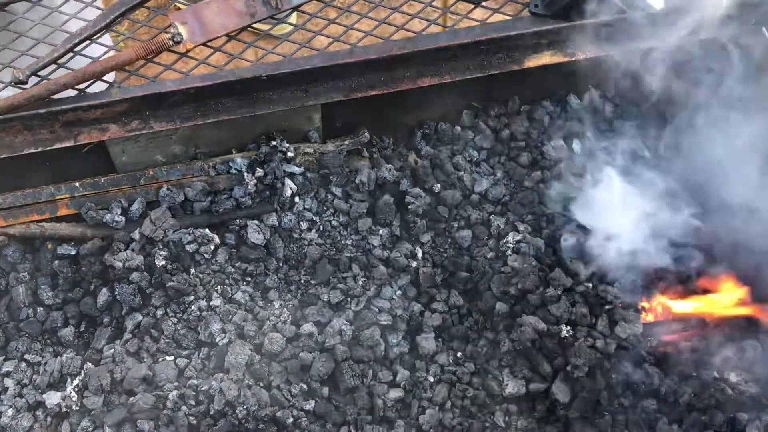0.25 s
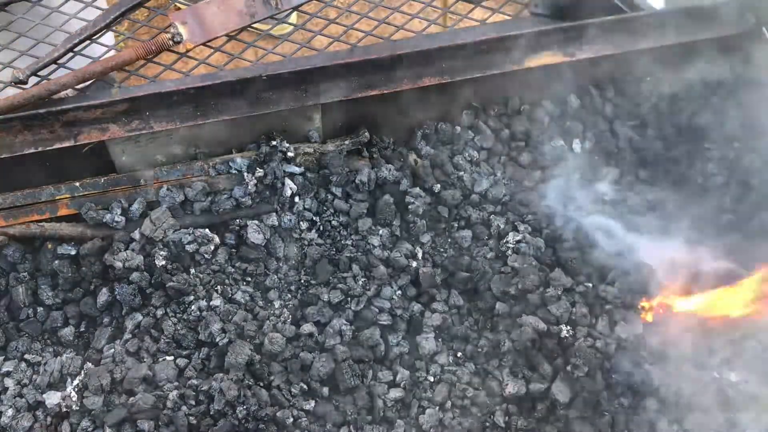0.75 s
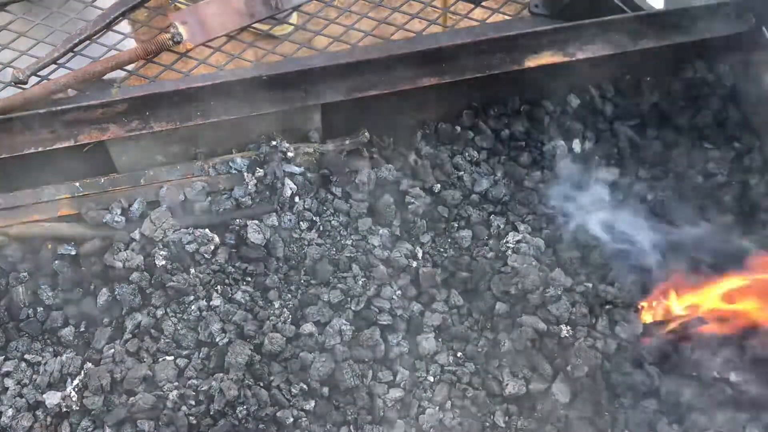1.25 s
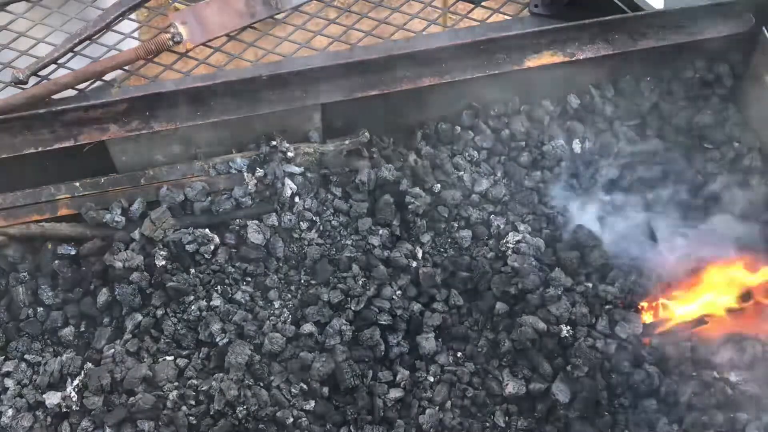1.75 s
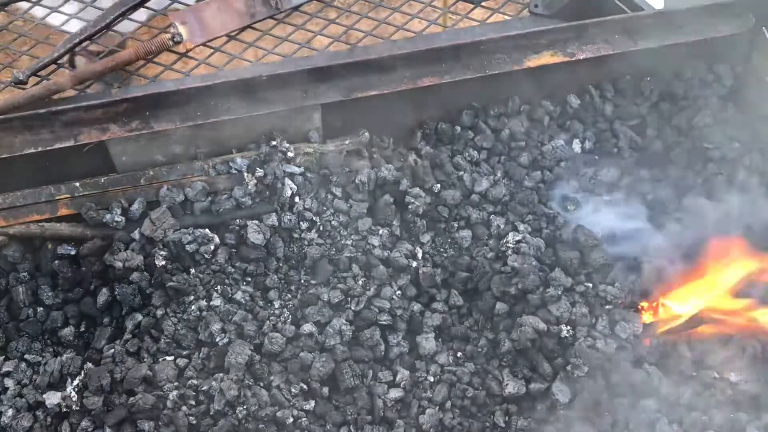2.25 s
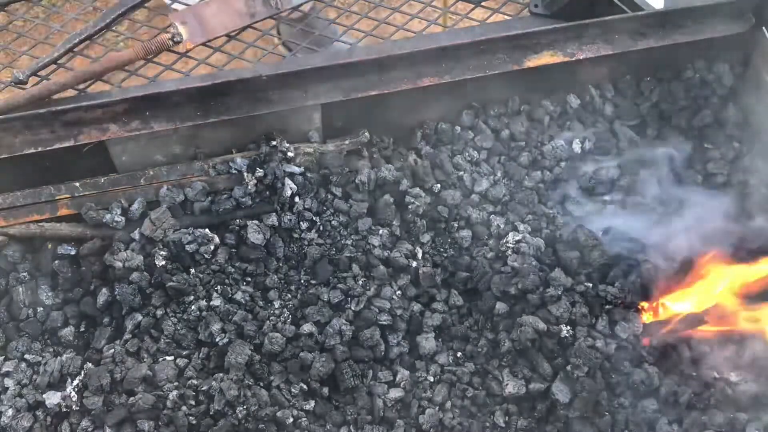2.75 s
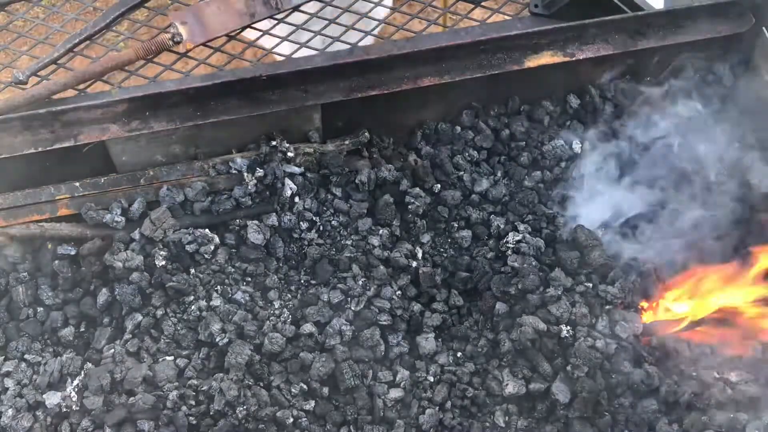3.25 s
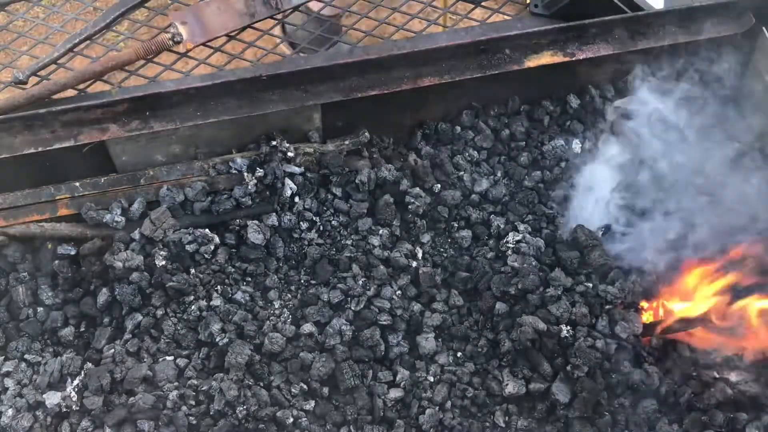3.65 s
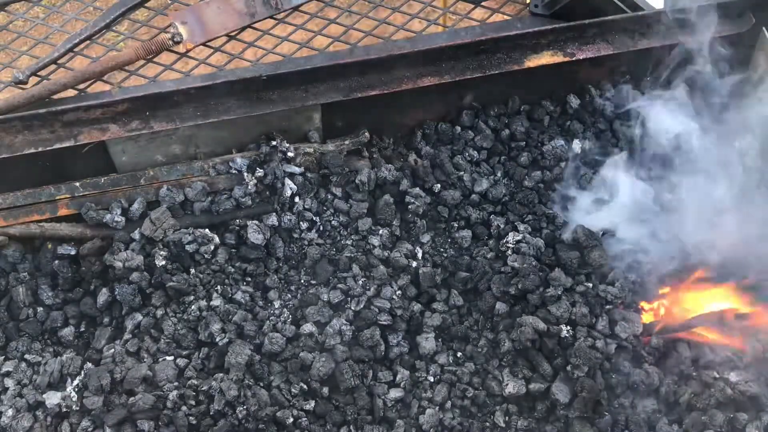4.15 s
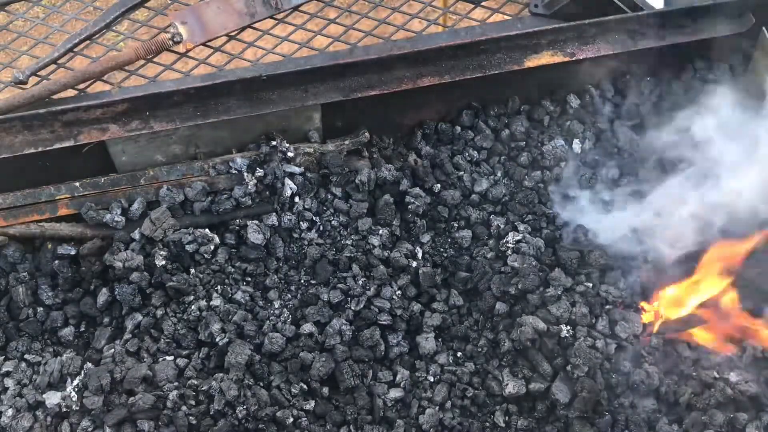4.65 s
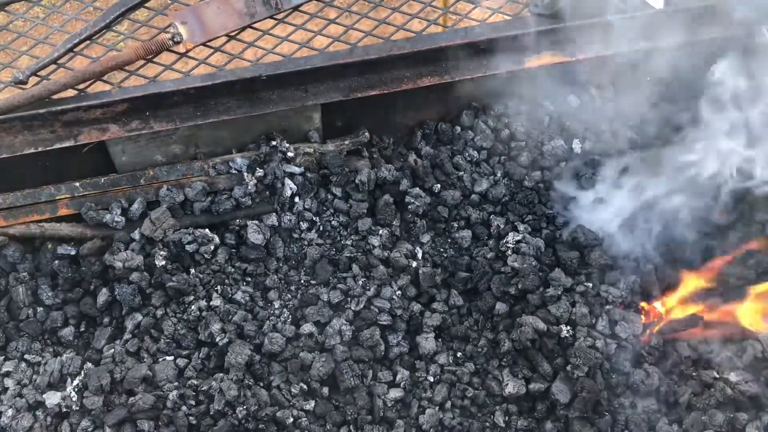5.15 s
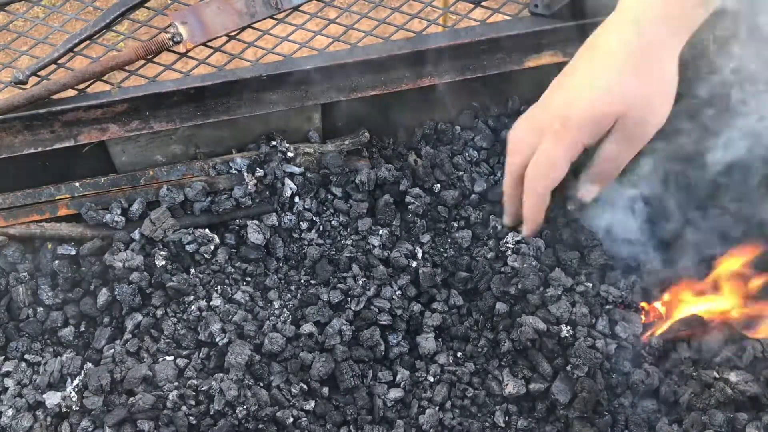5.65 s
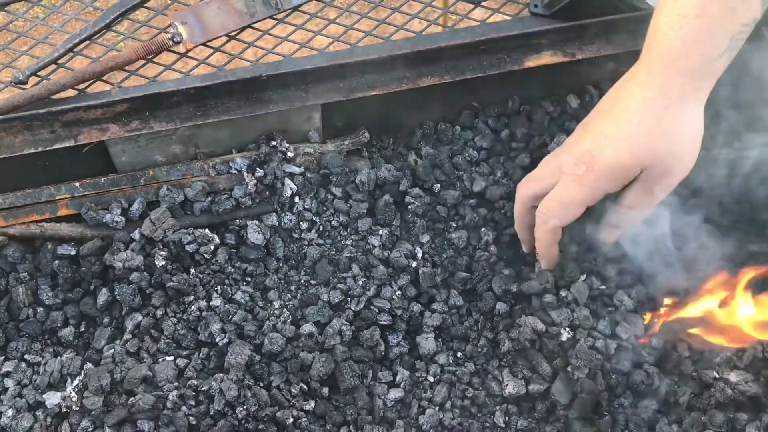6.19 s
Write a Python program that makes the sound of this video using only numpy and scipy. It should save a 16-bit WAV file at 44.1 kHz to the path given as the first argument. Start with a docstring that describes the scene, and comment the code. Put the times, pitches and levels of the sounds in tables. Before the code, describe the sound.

A forge blower on low whines throughout, a steady, nearly unchanging tone near 700 Hz with a strong octave above. Its air rushes through a coal bed as a soft low roar, a little stronger at first. Tiny dry ticks and faint gas hiss scatter over it, with one loud snap before the middle. At the end cloth rustles close to the single outdoor microphone.

```python
"""Electric forge blower on low, outdoors, one microphone: a 30-blade wheel, slightly off centre, whines at the
blade rate from the first moment while its air rushes up through a bed of coal. The draught, noise in three
bands, starts strong and settles over a few seconds; two gusts touch the microphone just before 1 s. Gas hisses
in soft puffs and coal cracks in sharp pulses, with the loudest snap near 2.7 s. From 5.6 s a sleeve rustles
close to the microphone, cloth noise with fine crackles and sharp snaps, and swells twice."""
import sys
import numpy as np
from scipy import signal
from scipy.fft import rfft, irfft, next_fast_len
from scipy.io import wavfile
from scipy.ndimage import uniform_filter1d, map_coordinates

SR = 44100
rng = np.random.default_rng(int(sys.argv[2]) if len(sys.argv) > 2 else 0)


def dump_mix(stems):
    """Bounce the given channels to the path in sys.argv[1] as a 16-bit WAV at rate SR."""
    frames = np.atleast_2d(stems).T  # one column per channel
    limited = np.clip(frames, -1, 1)  # hard clip at full scale
    pcm = np.round(limited * 32767).astype(np.int16)
    wavfile.write(sys.argv[1], SR, pcm)


N = 283122

# Blower wheel
BLADES = 30
START_TURN = 0.406  # where the wheel stands at the first moment, in turns
# cycles by which side lines lead: below any tone, and above the overtones
LEAD_BELOW, LEAD_ABOVE = 0.12, 0.22
# shaft speed: time_s, speed_turns_per_s
SHAFT_SPEED = [(0.0, 23.332), (0.8, 23.302), (1.2, 23.296), (1.6, 23.246), (2.3, 23.169), (2.8, 23.181),
               (3.4, 23.208), (4.0, 23.244), (4.8, 23.22), (5.2, 23.216), (5.6, 23.173), (6.42, 23.165)]
# whine at the microphone as hot air bends its path: time_s, blade_tone_db, octave_db, twelfth_db
WHINE_LEVELS = [(0, -38.5, -42.5, -61), (.45, -39, -41.5, -62.5), (.65, -37, -41, -62),
                (.86, -37.5, -43, -61), (1.3, -35, -41, -60.5), (1.55, -34, -40.5, -66),
                (2.05, -34.5, -39.5, -61), (2.6, -34, -40, -60.5), (2.82, -33, -39, -63),
                (3.09, -37.5, -39, -66), (3.38, -34, -39.5, -61), (3.66, -33.5, -41, -59),
                (4.04, -36.6, -38.5, -59.5), (4.36, -35, -41, -61.5), (4.6, -32.5, -37, -62),
                (5.2, -34.5, -40.5, -58), (5.4, -36, -39.5, -60), (5.72, -34.5, -37.5, -58.5),
                (6.42, -34, -38.5, -66)]
# random flicker of blade tone, octave and twelfth: one flicker_db for each
WHINE_FLICKER_DB = [0.42, .5, 1.5]
# lines round the blade tone from the off-centre wheel: shaft_multiple, level_db (on the blade tone's level)
BLADE_TONE_LINES = [(24, -31), (28, -27), (29, -28), (30, 0), (31, -18.5), (32, -32), (45, -28)]
# lines round the octave: shaft_multiple, level_db (on the octave's level)
OCTAVE_TONE_LINES = [(57, -28), (58, -20.5), (59, -19.5), (60, 0), (61, -16.5), (62, -32), (65, -35)]
# lines round the twelfth and higher: shaft_multiple, level_db (on the twelfth's level)
TWELFTH_TONE_LINES = [(90, -1.5), (91, -5.5), (92, -14), (119, -15), (120, -15), (121, -16), (122, -16),
                      (123, -17), (180, -24)]

# Draught through the coal; each spectrum sets only the colour
ROAR_DB, BLAST_DB, JET_DB = -40.5, -45, -56  # once settled
ROAR_EXTRA_DB, BLAST_EXTRA_DB, JET_EXTRA_DB = 3, 3, 1  # added at the start
SETTLE_S = 1.95
# flame roar: pitch_hz, relative_level_db (per Hz)
ROAR_SPECTRUM = [(18, -46.5), (30, -31), (45, -22), (57, -4), (75, -9), (105, -4.5), (150, 1), (220, -2),
                 (255, -4), (300, -2), (350, -6), (410, 0.5), (460, -3), (520, -12.5), (700, -56.5)]
# air blast: pitch_hz, relative_level_db (per Hz)
BLAST_SPECTRUM = [(380, -40.5), (500, -12.5), (560, -1), (660, -4.5), (780, -11.5), (880, -1.5),
                  (1100, -4.5), (1300, -5), (1420, -4.5), (1480, -14), (1540, -11), (1680, -20.5),
                  (1850, -22.5), (2000, -38.5)]
# jet through the grate: pitch_hz, relative_level_db (per Hz)
JET_SPECTRUM = [(1600, -20.5), (1850, -2.5), (2000, 3), (2300, 1.5), (2650, -2), (2850, -0.5), (3300, -5),
                (3800, -7.5), (4500, -7), (5600, -10), (6800, -19), (8000, -28), (10000, -32.5),
                (16000, -50.5)]

# Cracking coal, and from 5.7 s sharp snaps of the rustling sleeve sharp pulses: start_s, peak_db (of the pulse,
# before grit and knock), low_edge_hz, high_edge_hz
SHARP_PULSES = [(.0115, -56, 10000, 15500), (.0389, -51.5, 8900, 13900), (.0789, -47, 6000, 15500),
                (.157, -57, 8000, 14500), (.2411, -52, 7000, 14000), (.3536, -58.5, 8000, 15500),
                (.3913, -57, 8500, 15500), (.4489, -55, 9000, 15000), (.464, -47, 7500, 15500),
                (.4875, -51, 6000, 11000), (.7829, -50.5, 8000, 15500), (.9608, -51.5, 6500, 10100),
                (1.2591, -40.5, 9500, 15500), (1.4581, -48, 8000, 14900), (1.465, -56, 9500, 14000),
                (1.4963, -48, 8500, 15400), (1.524, -51, 8000, 16000), (1.7815, -39.5, 7000, 14000),
                (1.81, -56, 9000, 15600), (1.8173, -46.5, 6000, 15400), (2.0377, -49, 5500, 7500),
                (2.1723, -46, 7500, 14000), (2.37, -54, 9500, 15500), (2.4048, -51, 8500, 15800),
                (2.4218, -57.5, 8000, 15000), (2.5754, -53, 8000, 15500), (2.622, -55, 9500, 15400),
                (2.6382, -60.5, 9500, 15500), (2.655, -26, 5180, 10800), (2.9866, -54.5, 12500, 15800),
                (3.0151, -53.5, 10000, 15800), (3.1906, -59, 9000, 15900), (3.1946, -51.5, 9000, 15800),
                (3.382, -57, 9500, 15800), (3.9907, -51, 5000, 15000), (4.3381, -58, 9000, 15000),
                (4.4751, -52.5, 9000, 13400), (5.0814, -57, 8500, 12600), (5.429, -40.5, 4500, 13500),
                (5.514, -52, 10500, 15800), (5.701, -35, 2500, 6500), (5.82, -42, 7500, 10500),
                (5.903, -38.5, 10500, 13000), (5.9587, -41.5, 5000, 12500), (6.048, -41, 7500, 10000),
                (6.283, -41, 6500, 10600), (6.3267, -38.5, 7500, 14950), (6.398, -35, 11000, 12100)]
# a duller answer to each pulse; its band edges are multiples of the pulse's low edge
KNOCK_DB, KNOCK_LOW, KNOCK_HIGH, KNOCK_LAG_S = -6, 0.28, 0.7, 0.001
SPLINTERS, SPLINTER_T60_S = 0.55, 0.009  # noise amplitude beside the unit click, and its decay
GRIT_DB, GRIT_CYCLES = -21, 1150  # grit under the crack; its t60 in cycles of the band's middle

# Sleeve close to the microphone
# rustle, two swells after a sudden start: time_s, level_db (of the cloth noise, before its crackles)
RUSTLE_LEVEL = [(5.615, -100), (5.625, -55.5), (5.7, -54), (5.82, -54.5), (5.89, -49), (5.93, -51),
                (5.98, -48.5), (6.06, -46.5), (6.11, -50.5), (6.155, -59), (6.23, -57.5), (6.29, -49),
                (6.35, -48.5), (6.42, -57)]
# cloth noise: pitch_hz, relative_level_db (per Hz)
RUSTLE_SPECTRUM = [(1200, -18.5), (2500, -2), (4000, -4), (6000, -3), (8000, -3), (9700, 2), (12000, 0),
                   (14000, -3.5), (16500, -5)]

# Gas from the lumps
SIMMER_DB = -73.5
# puffs of gas over the simmer: peak_s, peak_db, rise_s, fall_s
GAS_PUFFS = [(.045, -70, .04, .04), (.33, -76, .15, 0.088), (.95, -72, 0.088, .04), (1.36, -71.5, .12, .07),
             (1.57, -66.5, .04, .012), (3.5, -73, .12, 0.14), (4.15, -68, .05, .06),
             (5.13, -77.5, .05, 0.098)]
# seeping gas: pitch_hz, relative_level_db (per Hz)
SEEP_SPECTRUM = [(3000, -27.5), (6000, -0.5), (8000, 0.5), (10000, 0.5), (13000, -4), (16500, -3)]

# Air on the microphone, and its port
BREEZE_DB, BREEZE_FADE_DB_PER_S = -66.5, 1
# gusts on the microphone: peak_s, peak_db, rise_s, fall_s
MIC_GUSTS = [(.77, -51, .04, .03), (.96, -46, .05, .05)]
# buffeting: pitch_hz, relative_level_db (per Hz)
BUFFET_SPECTRUM = [(15, -28.5), (28, -8), (42, -5), (60, -2.5), (90, -10.5), (150, -41.5)]
# notches of the microphone port: centre_hz, width_hz, depth (0 to 1)
PORT_NOTCHES = [(5000, 275, 0.41), (10400, 590, 0.38)]
TOP_HZ = 15830  # band limit


def amp(db):
    """Gain of a level in dB."""
    return 10 ** (np.asarray(db) / 20)


def unit(x):
    """x at rms 1."""
    return x / np.sqrt(np.mean(x ** 2) + 1e-20)


def curves(rows):
    """One value per sample for each column after the time."""
    time_s, *columns = np.transpose(rows)
    t = np.arange(N) / SR
    return [np.interp(t, time_s, column) for column in columns]


def wobble(rate):
    """A smooth random curve, rate knots a second."""
    knots = rng.standard_normal(int(N * rate / SR) + 4)
    return map_coordinates(knots, [np.arange(N) * rate / SR])


def swells(rows):
    """A gain curve of bell-shaped swells, each with its own rise and fall."""
    t = np.arange(N) / SR
    gain = np.zeros(N)
    for peak_s, db, rise_s, fall_s in rows:
        side_s = np.where(t < peak_s, rise_s, fall_s)
        gain += amp(db) * np.exp(-((t - peak_s) / side_s) ** 2)
    return gain


def filtered(x, response):
    """x times a response of frequency, padded with silence."""
    size = next_fast_len(N + SR // 2)
    spectrum = rfft(x, size) * response(np.fft.rfftfreq(size, 1 / SR))
    return irfft(spectrum, size)[..., :N]


def band(x, low_hz, high_hz):
    """Causal band-pass."""
    edges = np.clip([low_hz, high_hz], 20, SR / 2.2)
    return signal.sosfilt(signal.butter(2, edges, "band", fs=SR, output="sos"), x)


def rush(spectrum, patchy_db):
    """Coloured noise of rms 1 with patches of random gain in time and frequency."""
    z = signal.stft(rng.standard_normal(N + 512), nperseg=512)[2]
    patches = uniform_filter1d(rng.standard_normal(z.shape), size=6, axis=0)
    patches = uniform_filter1d(patches, size=12, axis=1)
    noise = signal.istft(z * amp(patchy_db * unit(patches)), nperseg=512)[1][:N]
    f, db = np.transpose(spectrum)

    def colour(hz):
        return amp(np.interp(np.log(hz + 1), np.log(f), db, -120, -120))

    return unit(filtered(noise, colour))


def grains(count, low_hz, high_hz, spread_db):
    """Scattered short decaying chirps at rms 1 overall, mostly small, a few large."""
    place, pitch, length = rng.random((3, count))
    hz = low_hz * (high_hz / low_hz) ** pitch
    life = (1.5 + 12 * length ** 2) / hz * SR  # samples
    k = np.arange(128)
    chirps = np.sin(2 * np.pi * np.outer(hz / SR, k))
    chirps *= np.exp(-k / life[:, None] * 4.8)
    size_db = spread_db * np.minimum(rng.exponential(size=count), 4)
    chirps *= amp(size_db)[:, None]
    where = (place * N).astype(int)[:, None] + k
    return unit(np.bincount(where.ravel(), chirps.ravel(), N + len(k))[:N])


def blower():
    """Every line is locked to the shaft angle; turbulence makes each one flicker a little."""
    turns = START_TURN + np.cumsum(curves(SHAFT_SPEED)[0]) / SR
    families = [BLADE_TONE_LINES, OCTAVE_TONE_LINES, TWELFTH_TONE_LINES]
    whine = np.zeros(N)
    for lines, level_db, flicker_db in zip(families, curves(WHINE_LEVELS), WHINE_FLICKER_DB):
        family_gain = amp(level_db + flicker_db * wobble(8))
        for order, db in lines:
            side = order % BLADES  # 0 on a whole multiple of the blade rate
            unsteady_db = 1.3 * wobble(5) * (side > 0)  # the side lines come and go
            if side > BLADES / 2:
                lead = LEAD_BELOW
            else:
                lead = LEAD_ABOVE * (side > 0 and order > 2 * BLADES)
            line = np.sqrt(2) * np.sin(2 * np.pi * (order * turns + lead))
            whine += family_gain * amp(db + unsteady_db) * line
    return whine


def draught():
    """Flame roar, air blast and the jet through the grate are noise settling from a stronger start."""
    early = np.exp(-(np.arange(N) / SR / SETTLE_S) ** 2)
    roar_gain = amp(ROAR_DB + ROAR_EXTRA_DB * early + 0.3 * wobble(7))
    blast_gain = amp(BLAST_DB + BLAST_EXTRA_DB * early + 0.62 * wobble(5))
    jet_gain = amp(JET_DB + JET_EXTRA_DB * early + 0.33 * wobble(3))
    roar = roar_gain * rush(ROAR_SPECTRUM, patchy_db=0.3)
    blast = blast_gain * rush(BLAST_SPECTRUM, patchy_db=0.94)
    jet = jet_gain * rush(JET_SPECTRUM, patchy_db=0.8)
    return roar + blast + jet


def crack_part(db, low_hz, high_hz):
    """A click with splinters, peaking at db, over slower-dying grit noise in the same band."""
    t = np.arange(SR // 2) / SR
    splinters, grit = rng.standard_normal((2, len(t)))
    click = t == 0
    snap = band(click + SPLINTERS * splinters * amp(-60 * t / SPLINTER_T60_S), low_hz, high_hz)
    grit_t60_s = GRIT_CYCLES / np.sqrt(low_hz * high_hz)
    grit_tail = unit(band(grit, low_hz, high_hz)) * amp(GRIT_DB - 60 * t / grit_t60_s)
    return amp(db) * (snap / np.abs(snap).max() + grit_tail)


def cracks():
    """Each sharp pulse sounds in its own band with a duller knock below it: coal splitting, and from 5.7 s the
    snaps of the rustling sleeve."""
    out = np.zeros(N + SR)
    for start_s, db, low_hz, high_hz in SHARP_PULSES:
        crack = crack_part(db, low_hz, high_hz)
        knock = crack_part(db + KNOCK_DB, KNOCK_LOW * low_hz, KNOCK_HIGH * low_hz)
        for part, lag_s in [(crack, 0), (knock, KNOCK_LAG_S)]:
            out[round((start_s + lag_s) * SR):][:len(part)] += part
    return out[:N]


def sleeve_rustle():
    """Rubbing cloth is noise of fast random gain, full of fine crackles."""
    roughness = amp(1.3 * wobble(60) + 1.3 * wobble(300))
    cloth = unit(roughness * rush(RUSTLE_SPECTRUM, patchy_db=1.0))
    crackles = amp(-5.5) * grains(count=16000, low_hz=4000, high_hz=15000, spread_db=2.6)
    return amp(curves(RUSTLE_LEVEL)[0] + 0.6 * wobble(25)) * (cloth + crackles)


def simmer():
    """Gas seeping from the lumps is a faint hiss in soft puffs, with tiny ticks."""
    seep_gain = np.hypot(amp(SIMMER_DB + 0.6 * wobble(6)), swells(GAS_PUFFS))
    seep = seep_gain * rush(SEEP_SPECTRUM, patchy_db=0)
    ticks = amp(-84) * grains(count=500, low_hz=8000, high_hz=15000, spread_db=2.5)
    return seep + ticks


def breeze():
    """Moving air buffets the microphone as low noise, slowly fading, with two short gusts."""
    t = np.arange(N) / SR
    gain = amp(BREEZE_DB - BREEZE_FADE_DB_PER_S * t) + swells(MIC_GUSTS)
    return gain * rush(BUFFET_SPECTRUM, patchy_db=4.0)


def scene():
    """All sources reach one microphone in the open air."""
    fire = draught() + cracks() + simmer()
    return (blower() + fire + sleeve_rustle() + breeze())[None]


def record(dry):
    """The microphone port notches two bands; nothing is kept above the band limit."""
    def microphone(hz):
        gain = np.ones(len(hz))
        for centre_hz, width_hz, depth in PORT_NOTCHES:
            gain *= 1 - depth * np.exp(-((hz - centre_hz) / width_hz) ** 2)
        return gain * (hz < TOP_HZ)

    return filtered(dry, microphone)


dry = scene()
out = record(dry)
dump_mix(out)
```